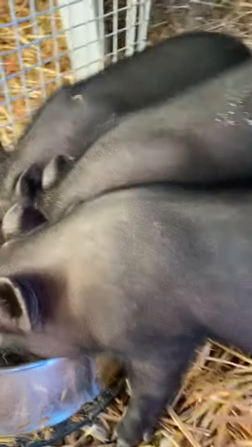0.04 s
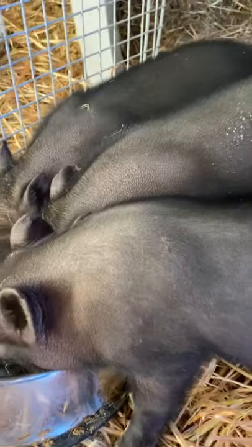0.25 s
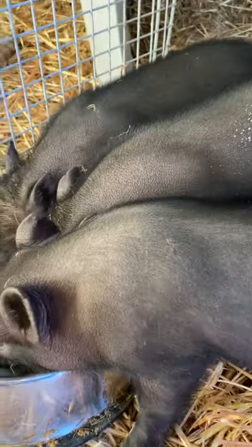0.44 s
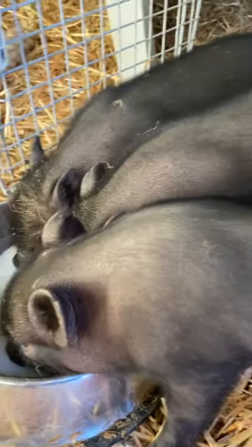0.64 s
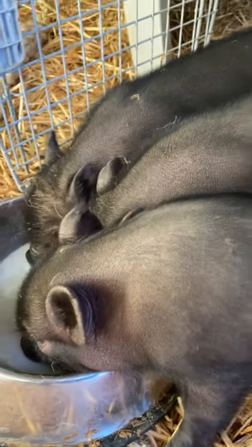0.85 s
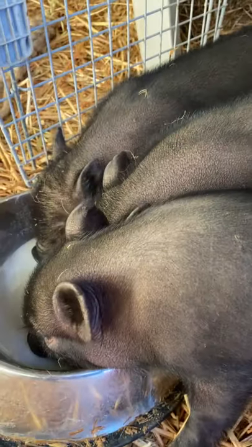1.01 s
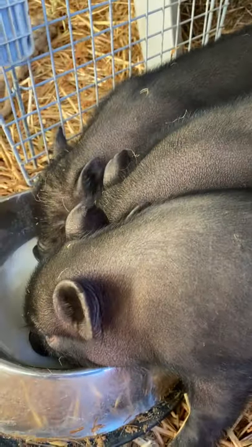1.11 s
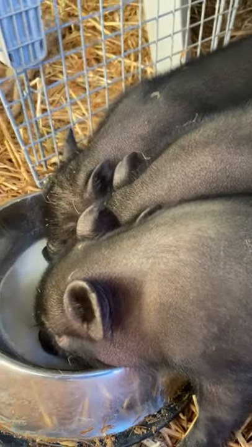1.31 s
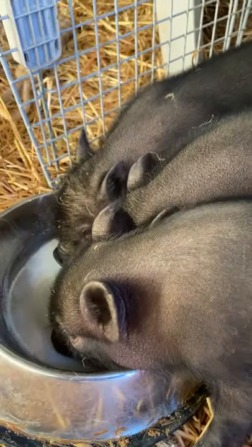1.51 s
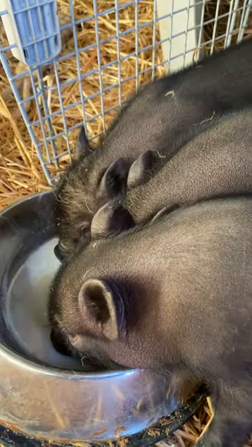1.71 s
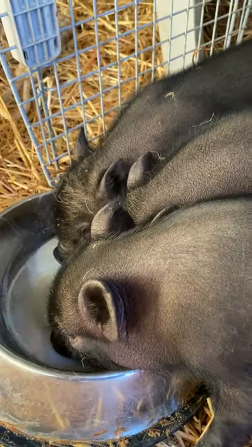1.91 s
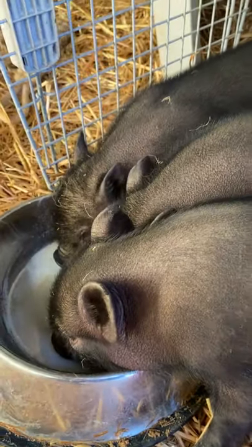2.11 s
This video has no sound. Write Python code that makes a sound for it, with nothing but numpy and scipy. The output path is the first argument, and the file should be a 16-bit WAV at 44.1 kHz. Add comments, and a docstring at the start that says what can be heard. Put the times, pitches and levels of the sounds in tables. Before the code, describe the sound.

Wet slurping from piglets drinking at a metal bowl, close to the microphone. A loud squelching slurp comes early, then lighter lapping and soft steps in the pen's straw, then another loud slurp and a quieter, drawn-out one.

```python
"""Three piglets drink from a steel bowl in a straw pen, heard close up over a low rumble.
Small slurps lead to a big one at half a second, each a rush of bursting bubbles: wet squelch and
spray at the lips, then a deeper gurgle. Tongues plop and lips smack in between, and the bowl
rings briefly with it all. Around one second, trotters bump in the rustling straw.
A second big slurp lands at 1.6 s, and a soft, long one carries the ending."""
import sys
import numpy as np
from scipy import signal
from scipy.fft import rfft, irfft, next_fast_len
from scipy.io import wavfile

SR = 44100
rng = np.random.default_rng(int(sys.argv[2]) if len(sys.argv) > 2 else 0)


def master_out(mix):
    """Clip the mix to full scale and print it as 16-bit PCM to the path in sys.argv[1]."""
    frames = np.transpose(np.atleast_2d(mix))
    ceiling = np.clip(frames, -1, 1)
    pcm = np.round(ceiling * 32767).astype(np.int16)
    wavfile.write(sys.argv[1], SR, pcm)


N = 94815

# slurps: t/s, swell/s, hold/s, fade by 20 dB/s, then the peaks: hollow/dB, gurgle/dB, squelch/dB, spray/dB
SLURP_CUES = [(0.0, 0.01, 0.0041, 0.0254, -62, -38.5, -44, -54.5),
              (0.155, 0.01, 0.023, 0.184, -62, -45, -48.5, -57.5),
              (0.229, 0.017, 0.014, 0.03, -49, -32, -42.5, -43.5),
              (.467, .017, 0.008, 0.0157, -49.5, -24, -23.5, -42),
              (0.676, .025, 0.045, 0.1, -54, -44, -43.5, -53),
              (0.908, 0.009, 0.014, 0.0253, -57.5, -53.5, -46, -59),
              (.983, 0.004, 0.068, 0.02, -56.5, -48.5, -47, -58.5),
              (1.25, 0.043, 0.043, 0.1249, -50, -42, -42, -53),
              (1.498, 0.03, 0.0073, 0.26, -64, -52, -61, -60.5),
              (1.619, 0.019, 0.0028, 0.0374, -55, -28, -30.5, -38),
              (1.841, 0.0042, 0.055, 0.0034, -46.5, -43, -39.5, -49),
              (2.058, 0.078, 0.036, 2, -60.5, -43.5, -45.5, -53)]
# EQ curves of the four slurp layers: f/Hz, gain/dB
HOLLOW_EQ = [(150, -22), (280, -10), (345, 0.5), (450, -6.5), (650, -15.5), (1200, -47)]
GURGLE_EQ = [(150, -41), (380, -25.5), (480, -9), (560, -3), (680, 2), (850, -5), (1100, -4.5), (1300, -19),
             (2500, -40)]
SQUELCH_EQ = [(500, -34.5), (1000, -14.5), (1250, -15), (1550, -6.5), (1900, -2.5), (2400, 0), (2800, -8.5),
              (3200, -8), (3900, -15.5), (7000, -45)]
SPRAY_EQ = [(1500, -25), (3000, -10), (4200, -3.5), (5000, -2), (5700, 2), (6500, 5), (7200, -12.5),
            (8500, -22), (11500, -30), (13000, -11), (16000, -19)]
# tongue plops and lip smacks: t/s, f/Hz, relative level/dB
PLOP_CUES = [(.029, 590, -31), (.165, 570, -29.5), (.407, 644, -33.5), (.42, 623, -32.5), (.63, 555, -36.5),
             (.644, 547, -34), (.873, 610, -42.5), (.892, 558, -35), (1.105, 766, -35.5),
             (1.349, 600, -31.5), (1.393, 645, -35), (1.411, 630, -37), (1.479, 630, -36),
             (1.658, 733, -29.5), (1.735, 630, -39.5), (1.773, 657, -34.5)]
SMACK_CUES = [(.011, 2000, -32), (.109, 2740, -44), (.258, 1650, -30.5), (.269, 1620, -34),
              (.471, 2350, -25), (.485, 2310, -23), (.546, 2324, -37.5), (.705, 2420, -34.5),
              (.727, 2480, -33.5), (.682, 3010, -25), (.683, 3900, -30.5), (.686, 1710, -35),
              (.716, 2490, -31), (.766, 2390, -41), (.927, 2670, -31.5), (.993, 2460, -30.5),
              (1.006, 2240, -35), (1.253, 2260, -38.5), (1.621, 2060, -25), (1.645, 2323, -20.5),
              (1.715, 5100, -43), (1.801, 4600, -40), (1.848, 1800, -25), (1.88, 2090, -35),
              (1.906, 2230, -31.5), (1.92, 2120, -31), (1.971, 1740, -36), (1.981, 1754, -45),
              (2.003, 1790, -48)]
# films of liquid and bits of straw snapping: t/s, centre f/Hz, relative level/dB
TICK_CUES = [(0.109, 5040, -49), (.167, 5100, -36.5), (.258, 5400, -38), (.27, 3950, -36),
             (.422, 2120, -45), (.467, 6300, -32.5), (0.475, 13300, -37), (.547, 4140, -53),
             (.632, 5340, -51), (.683, 7940, -35), (0.717, 6100, -38), (.786, 4100, -45.5),
             (.928, 3960, -33.5), (1.007, 5160, -37.5), (1.271, 5100, -34.5), (1.357, 4660, -44),
             (1.432, 7800, -49), (1.513, 6600, -42), (1.547, 6740, -44), (1.578, 10100, -45),
             (1.642, 5900, -27), (1.785, 2380, -45.5), (1.815, 7900, -52), (1.849, 6630, -31),
             (1.908, 5050, -41), (2.002, 10300, -41), (2.106, 4700, -35.5)]
# modes of the bowl with liquid in it: f/Hz, relative level/dB, t60/s
BOWL_MODES = [(345.3, -5.5, 0.28), (670, -7, 0.059), (1092, 1.5, 0.089), (1412, -2.5, 0.085),
              (1584, 2.5, 0.083), (1880, -14, 0.16), (2120, -8.5, 0.24), (2372, -12, 0.14),
              (2510, -12, 0.086), (3133, -1.5, 0.1)]
# soft trotter bumps: t/s, f/Hz, level/dB
BUMP_CUES = [(.915, 140, -38.5), (.957, 127.5, -36.5), (.975, 93, -42), (1.113, 121, -47), (1.78, 131, -45)]
# fader ride of the straw rustle: t/s, level/dB
STRAW_FADER = [(0, -61.5), (.3, -64.5), (.38, -74), (.55, -62), (.62, -74.5), (.84, -66.5), (1.13, -55.5),
               (1.25, -58.5), (1.4, -86), (1.44, -58), (1.48, -68), (1.6, -63.5), (1.73, -59),
               (1.78, -71.5), (1.93, -67.5), (2.04, -76), (2.15, -65)]
# EQ of the straw: f/Hz, gain/dB
STRAW_EQ = [(200, -4.5), (600, 6), (1200, -2), (2300, -2), (3600, 1.5), (6200, -2), (7500, -8),
            (10000, -12.5), (12500, -12), (16000, -38)]
# decay of the pen's echo: f/Hz, t60/s
PEN_DECAY = [(200, 0.22), (700, 0.13), (2500, 0.12), (14000, 0.077)]
# fader ride of the farm rumble: t/s, level/dB
RUMBLE_FADER = [(0, -58), (.25, -61), (.38, -69), (.6, -60.5), (.85, -71.5), (1.0, -60.5), (1.7, -60),
                (1.85, -58), (2.15, -62.5)]
# EQ of the rumble: f/Hz, gain/dB
RUMBLE_EQ = [(20, -26), (50, -10.5), (85, 1), (125, -2), (200, -4.5), (300, -14), (700, -14), (1500, -33.5),
             (4000, -71.5)]
# phase of the left microphone port ahead of the right: f/Hz, lead/rad
LEFT_LEAD = [(120, 0), (600, -0.59), (1150, 0.35), (1400, 0.3), (2400, 0.84), (2850, 1.59), (3700, .5),
             (4500, 1.59), (5100, 0.03), (7200, 3), (8500, 4), (9700, 7.5), (11500, 7), (12500, 10.5),
             (14600, 10), (16000, 15)]
# balance of the ports, left minus right: f/Hz, level/dB
LEFT_BALANCE = [(200, -0.5), (700, -1.1), (1250, -4.5), (1550, 0.5), (2200, 0.5), (2600, -2.5), (3200, 0.5)]


def slurps():
    """Air and liquid sucked through the lips: large, middling and tiny bubbles over the mouth's hollow."""
    hollow_db, gurgle_db, squelch_db, spray_db = np.transpose(SLURP_CUES)[-4:]
    hollow = noise(HOLLOW_EQ)
    gurgle = bubbles(GURGLE_EQ, per_s=350, centre_hz=711, spread=0.31, cycles=5.94,
                     scatter_db=4.5, air=0.26, leveller_s=0.025)
    squelch = bubbles(SQUELCH_EQ, per_s=500, centre_hz=2120, spread=0.318, cycles=19.4,
                      scatter_db=5.5, air=0.27, leveller_s=0.011)
    spray = bubbles(SPRAY_EQ, per_s=900, centre_hz=5300, spread=0.38, cycles=5.2,
                    scatter_db=6.5, air=0.5, leveller_s=0.09)
    return (gurgle * suction(gurgle_db, lag_s=0.0064, swell_db=15)  # builds later, from lower down
            + hollow * suction(hollow_db) + squelch * suction(squelch_db) + spray * suction(spray_db))


def suction(peaks_db, lag_s=0, swell_db=9.5):
    """One layer's envelope over all slurps: the lips snap open, the pull swells, holds and fades."""
    power, open_s = np.zeros(N), 0.0021
    for (start, swell, hold, fade, *_), peak_db in zip(SLURP_CUES, peaks_db):
        t = np.arange(N) / SR - start
        opening = np.clip(t / open_s, 0, 1)
        rise_db = -swell_db * np.clip(1 - t / (swell + lag_s), 0, 1)
        fall_db = -20 * np.maximum(t - swell - hold - lag_s, 0) / fade
        power += (opening * amp(peak_db + rise_db + fall_db)) ** 2
    return np.sqrt(power)


def bubbles(eq, per_s, centre_hz, spread, cycles, scatter_db, air, leveller_s):
    """A levelled stream of rising pings on air noise; each ping dies by 60 dB in `cycles` periods."""
    candidates, grain_samples = 9000, 500
    position, chance = rng.random((candidates, 2)).T
    kept = chance < per_s * N / SR / candidates
    pitch, strength = rng.standard_normal((2, candidates))[:, kept, None]
    t = np.arange(grain_samples) / SR
    turns = centre_hz * np.exp(spread * pitch) * t
    life = np.minimum(turns / cycles, 2)
    grains = amp(scatter_db * strength - 60 * life) * np.sin(2 * np.pi * turns * (1 + 0.077 * life))
    slots = (position[kept, None] * N).astype(int) + np.arange(grain_samples)
    stream = unit(np.bincount(slots.ravel(), grains.ravel(), N + grain_samples)[:N])
    blend = unit(equalise(stream, eq)) + air * noise(eq)
    window = signal.windows.hann(int(leveller_s * SR) + 3)
    power = np.abs(signal.fftconvolve(blend ** 2, window / window.sum(), 'same'))
    return blend / np.sqrt(power + 1e-6)


def lapping():
    """Tongues plop in the liquid with a splash; lips smack higher up, with a little spit."""
    splash = amp(-9) * noise(GURGLE_EQ)
    spit = amp(-4) * noise(SQUELCH_EQ)
    plops = pops(PLOP_CUES, cycles=14.3, glide=0.036, attack_s=0.002, wet=splash)
    smacks = pops(SMACK_CUES, cycles=34.1, glide=0.09, attack_s=0.00062, wet=spit)
    return amp(3) * plops + amp(2) * smacks


def pops(cues, cycles, glide, attack_s, wet):
    """Damped cavity tones plus wet noise; the pitch bends by the fraction `glide` per 60 dB of decay."""
    out, t = np.zeros(N), np.arange(SR // 6) / SR
    for start, hz, db in cues:
        life = np.minimum(hz * t / cycles, 2)
        tone = np.sqrt(2) * np.sin(2 * np.pi * np.cumsum(hz * (1 + glide * life)) / SR)
        envelope = amp(db - 60 * life) * (1 - np.exp(-t / attack_s))
        wetness = np.roll(wet, -round(start * SR))[:len(t)]
        add(out, start, envelope * (tone + wetness))
    return out


def ticks():
    """Liquid films and bits of straw snap: tiny bright noise bursts, each in its own band."""
    out, t = np.zeros(N), np.arange(SR // 20) / SR
    t60_s, edge_ratio = 0.0091, 1.134
    for start, hz, db in TICK_CUES:
        band = signal.butter(2, [hz / edge_ratio, hz * edge_ratio], 'band', fs=SR)
        burst = unit(signal.lfilter(*band, rng.standard_normal(len(t))))
        add(out, start, amp(db + 3.5 - 60 * t / t60_s) * burst)
    return out


def bowl(drinking):
    """The steel bowl rings with whatever happens in it; upper modes reach the two sides out of step."""
    t, sides = np.arange(SR // 3) / SR, np.array([[1], [-1]])
    ring = np.zeros((2, len(t)))
    for k, (hz, db, t60) in enumerate(BOWL_MODES):
        skew_rad = 0.65 * (-1) ** k if k > 1 else 0
        unity_peak = 2 * np.log(1000) / (t60 * SR)  # keeps the resonance gain independent of decay
        ring += unity_peak * amp(db - 60 * t / t60) * np.cos(2 * np.pi * hz * t + sides * skew_rad)
    return amp(-1.5) * (drinking + signal.fftconvolve(drinking[None], ring, axes=1)[:, :N])


def bedding():
    """Trotters shift in the straw: short, airy grains for the rustle, sagging low tones for the bumps."""
    straw = bubbles(STRAW_EQ, per_s=1200, centre_hz=3780, spread=0.77, cycles=4.1,
                    scatter_db=8.0, air=0.97, leveller_s=0.028)
    bumps = pops(BUMP_CUES, cycles=9.6, glide=-0.24, attack_s=0.0048, wet=np.zeros(N))
    return fader(STRAW_FADER) * straw + bumps


def pen_echo(near):
    """The pen's short, dry echo: a separate noise tail on each side, the treble dying first."""
    hz, t, spectra = signal.stft(rng.standard_normal((2, SR // 3)), SR, nperseg=256)
    decay = amp(-60 * t / along(PEN_DECAY, hz)[:, None])
    tail = signal.istft(spectra * decay, SR, nperseg=256)[1]
    tail = np.pad(tail, ((0, 0), (SR // 300, 0)))  # pre-delay
    return signal.fftconvolve(near, tail / np.linalg.norm(tail[0]), axes=1)[:, :N]


def rumble():
    """The low background bed of the farm."""
    return fader(RUMBLE_FADER) * noise(RUMBLE_EQ)


def amp(db):
    """Decibels to gain."""
    return 10 ** (np.asarray(db) / 20)


def unit(x):
    """Scaled to rms 1."""
    return x / np.sqrt(np.mean(x ** 2) + 1e-20)


def along(points, hz):
    """A curve read on a log frequency axis."""
    freqs, values = np.transpose(points)
    return np.interp(np.log(hz + 1), np.log(freqs + 1), values)


def fader(points):
    """A fader ride as one gain per sample."""
    return amp(np.interp(np.arange(N) / SR, *np.transpose(points)))


def equalise(x, eq, size=4096):
    """A minimum-phase EQ of unit energy."""
    cepstrum = irfft(np.log(amp(along(eq, np.fft.rfftfreq(size, 1 / SR)))))
    cepstrum[1:size // 2] *= 2
    cepstrum[size // 2 + 1:] = 0
    impulse = irfft(np.exp(rfft(cepstrum)))
    return signal.fftconvolve(x, impulse / np.linalg.norm(impulse))[:len(x)]


def noise(eq):
    """Noise coloured by an EQ curve, at rms 1."""
    return unit(equalise(rng.standard_normal(N), eq))


def add(out, start_s, sound):
    """Mix a sound in at its cue."""
    i = round(start_s * SR)
    out[i:i + len(sound)] += sound[:N - i]


def scene():
    """The mix: drinking and straw up front, the pen's echo around them, rumble underneath."""
    near = bowl(slurps() + lapping() + ticks()) + bedding()
    return near + amp(-13.5) * pen_echo(near) + rumble()


def record(dry):
    """Two microphone ports spread the image in phase and level; a brick-wall cut trims the top."""
    size, top_hz = next_fast_len(N + SR // 2), 16500
    hz, side = np.fft.rfftfreq(size, 1 / SR), np.array([[.5], [-.5]])
    balance = amp(side * along(LEFT_BALANCE, hz))
    phase = np.exp(1j * side * along(LEFT_LEAD, hz))
    return irfft(rfft(dry, size) * balance * phase * (hz < top_hz), size)[:, :N]


dry = scene()
out = record(dry)
master_out(out)
```